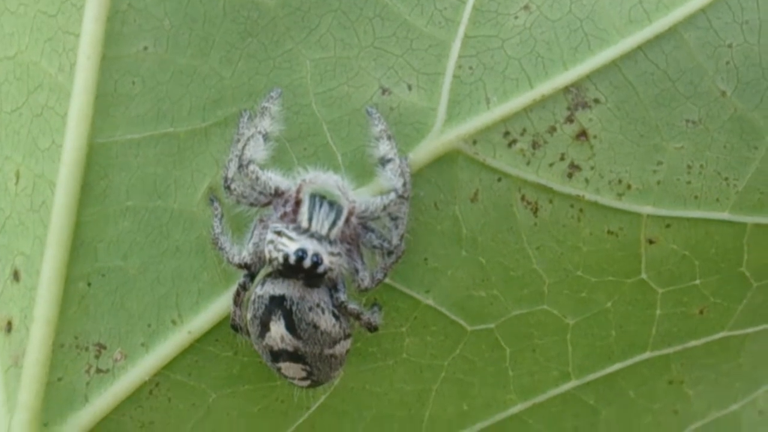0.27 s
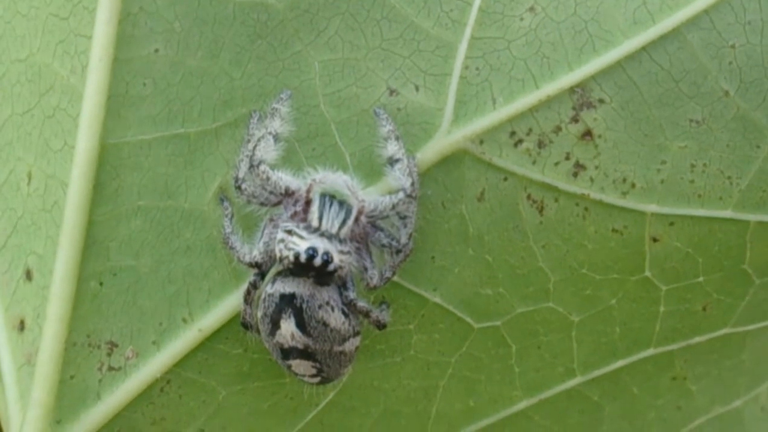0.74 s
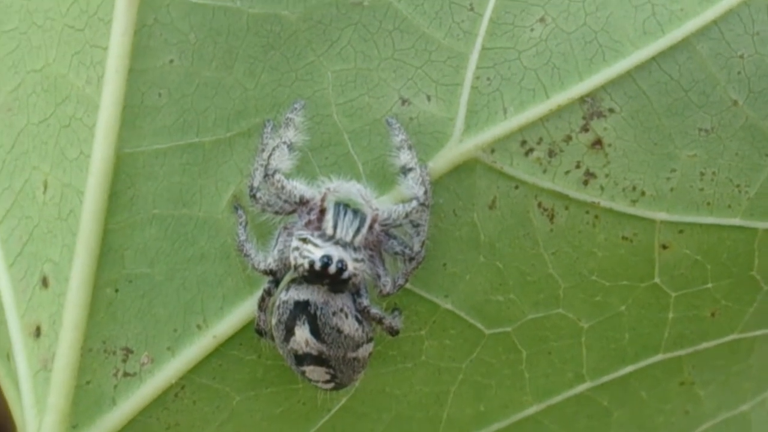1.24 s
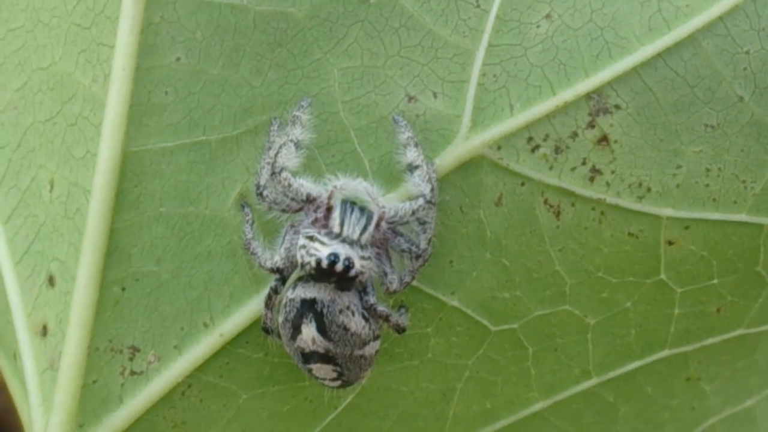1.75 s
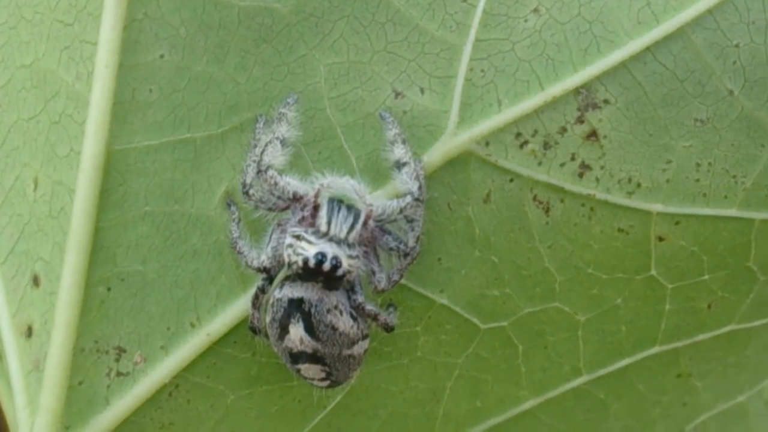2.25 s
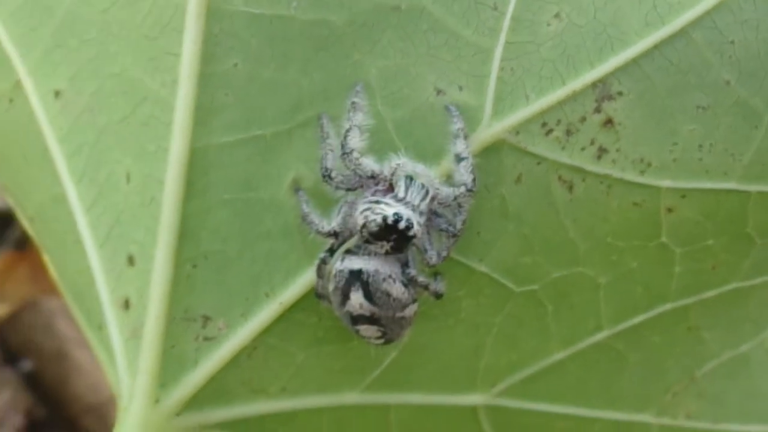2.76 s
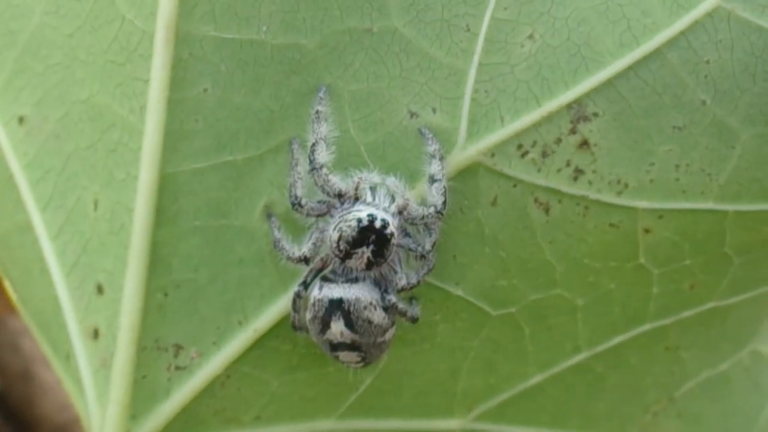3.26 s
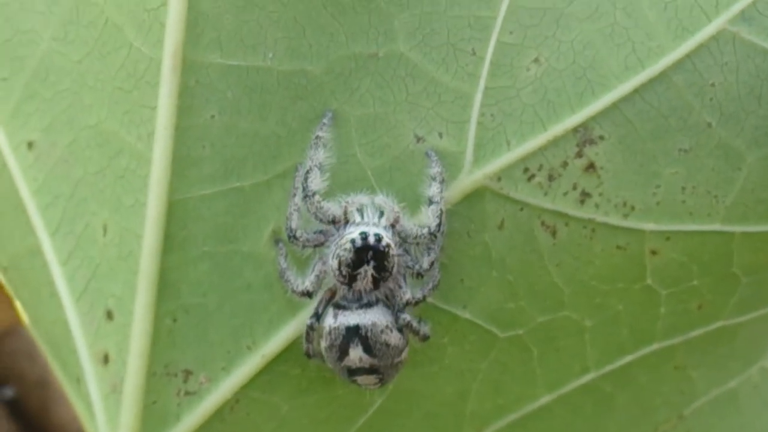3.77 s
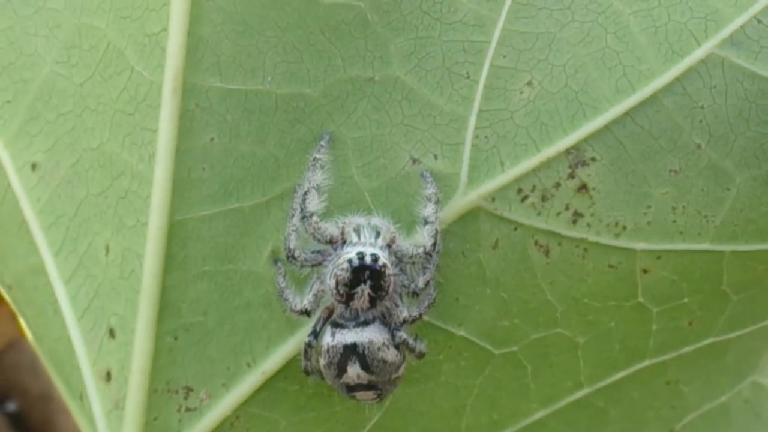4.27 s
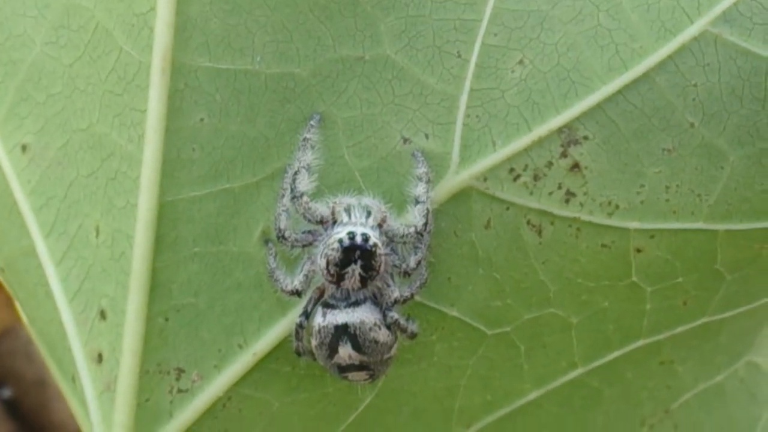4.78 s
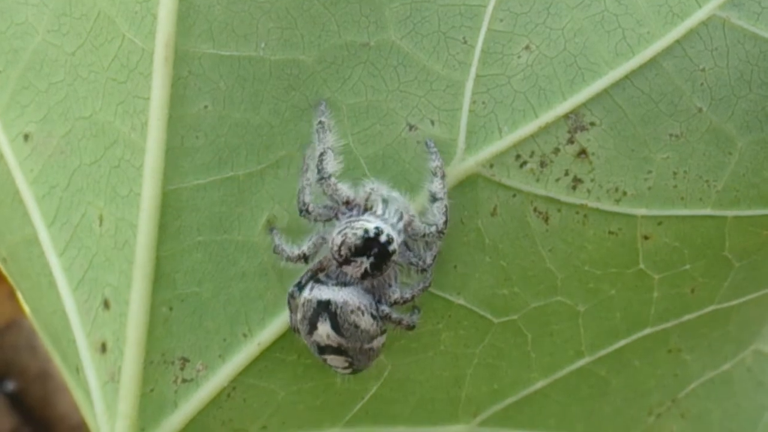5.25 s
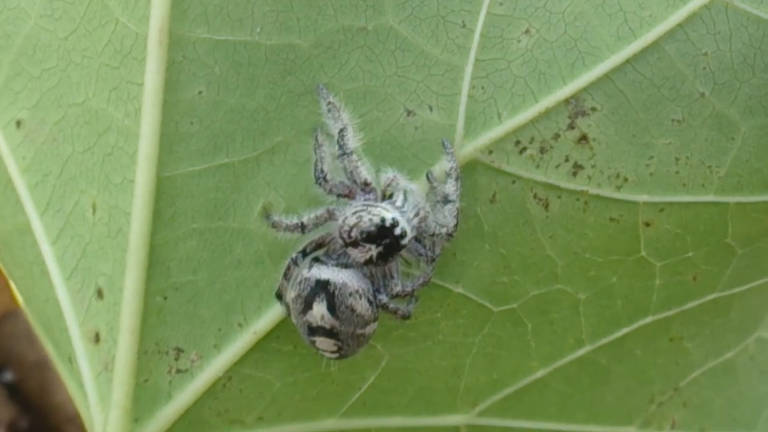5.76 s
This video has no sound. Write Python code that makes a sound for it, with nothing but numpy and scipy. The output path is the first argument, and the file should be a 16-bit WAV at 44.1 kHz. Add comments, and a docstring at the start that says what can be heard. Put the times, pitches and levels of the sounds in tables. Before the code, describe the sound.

A breeze rumbles on the microphone throughout, mostly on the right, over a faint high insect hiss and a distant, quickly pulsing cricket. In the first second, leaves brush in a few light rustles and thin, far-off whistles rise. The wind strengthens from about 2 to 3.5 seconds, with short low thumps. On the left, the hand holding the camera rumbles and knocks softly between 2.2 and 2.6 seconds and again near 3.5. At about 3.1 and 3.3 seconds, a small bird on the right gives two high, stuttering, slightly raspy chirps of quick falling notes, with a very short echo. The wind eases, then gusts and thumps again from 5 to 5.5 seconds, while more faint whistles rise in the distance. On the left, the lens ticks faintly about twice a second, its thin whir swelling slightly near 1.7 and 3.9 seconds.

```python
"""Outdoors among leaves, a breeze buffets a camera's right microphone port over a faint insect hiss.
A small bird gives two stuttering chirps of quick down-slurs; far off a cricket pulses and thin whistles
rise. The foliage scatters bird and whistles into a short echo, and leaves brush in brief rustles.
On the left, the hand rumbles through the camera body and the lens drive faintly whirs and ticks."""
import sys
import numpy as np
from scipy import signal
from scipy.fft import rfft, irfft, next_fast_len
from scipy.io import wavfile
from scipy.ndimage import uniform_filter1d, map_coordinates

SR = 44100
rng = np.random.default_rng(int(sys.argv[2]) if len(sys.argv) > 2 else 0)


def wav_out(sig):
    """Save sig, one row per channel (or a flat mono array), as 16-bit PCM at SR to the path in sys.argv[1]."""
    wavfile.write(sys.argv[1], SR, np.round(np.clip(np.atleast_2d(sig).T, -1, 1) * 32767).astype(np.int16))


N = 265482
TIME = np.arange(N) / SR


def amp(db):
    """Amplitude ratio of a level in decibels."""
    return 10 ** (np.asarray(db) / 20)


def unit(x):
    """Normalisation to an rms of 1."""
    return x / np.sqrt(np.mean(x ** 2) + 1e-20)


def along(points, hz):
    """Interpolation of (frequency [Hz], value) points on a logarithmic frequency axis."""
    frequencies, values = np.transpose(points)
    return np.interp(np.log(hz + 1), np.log(frequencies + 1), values)


def wobble(rate):
    """Smooth random modulation: a spline through `rate` Gaussian values a second."""
    return map_coordinates(rng.standard_normal(int(N * rate / SR) + 4), [TIME * rate])


def filtered(x, response):
    """Linear filtering: the spectrum of x is multiplied by a frequency response."""
    size = next_fast_len(N + SR // 2)
    return irfft(rfft(x, size) * response(np.fft.rfftfreq(size, 1 / SR)), size)[..., :N]


def noise(spectrum):
    """White noise shaped to a spectral density given as (frequency [Hz], density [dB/Hz])."""
    return filtered(rng.standard_normal(N), lambda hz: amp(along(spectrum, hz))) * np.sqrt(SR / 2)


def swell(centre_s, length_s):
    """Raised-cosine envelope: a smooth rise and fall."""
    return np.cos(np.pi * np.clip((TIME - centre_s) / length_s, -.5, .5)) ** 2


def scatter(width_hz):
    """Spectral broadening: a random complex gain that spreads a tone into a band."""
    return (wobble(width_hz) + 1j * wobble(width_hz)) / np.sqrt(2)


def placed(x, left_db, right_db):
    """Level difference between the two ports gives a sound its side."""
    return np.array([amp(left_db) * x, amp(right_db) * x])


# strength of the breeze (time [s], level [dB])
BREEZE_STRENGTH = [(0.0, -50), (0.14, -39.5), (0.26, -46), (1.3, -48.5), (1.96, -31), (2.24, -34.5),
                   (2.96, -34), (3.04, -36.5), (3.54, -34), (3.76, -42), (4.26, -41.5), (4.36, -49),
                   (4.88, -43.5), (5.06, -30.5), (5.4, -39.5), (5.48, -39.5), (5.6, -39.5), (6.0, -43)]
# slow buffets and fine flutter, each (frequency [Hz], relative density [dB])
BUFFET_SPECTRUM = [(8, 3), (20, 2.5), (32, 3.5), (55, -8), (85, -14), (130, -38), (250, -58), (600, -100)]
FLUTTER_SPECTRUM = [(50, -18), (95, 5.5), (140, -1), (200, -14.5), (300, -37), (600, -81), (2000, -40)]
# eddies striking the port (time [s], pulse level [dB], half-width [s], wake level [dB])
EDDY_STRIKES = [(.153, -31.5, 0.0048, -69), (1.681, -33, 0.0048, -54.5), (1.935, -18, 0.0043, -51),
                (2.477, -20.5, 0.0055, -47), (2.528, -35, .005, -47.5), (2.836, -24.5, 0.0053, -59),
                (2.936, -23.5, 0.0048, -60), (3.085, -35.5, 0.009, -42), (3.279, -29.5, 0.0057, -46.5),
                (3.504, -18.5, 0.0056, -47.5), (5.07, -23.5, 0.0037, -53), (5.251, -24.5, .0086, -57),
                (5.406, -31.5, 0.0066, -51.5), (5.476, -20.5, 0.0095, -51)]


def wind():
    """Turbulent pressure at the windward port: buffets and flutter grow with the breeze; eddies push."""
    strength_db = np.interp(TIME, *np.transpose(BREEZE_STRENGTH))
    buffet = amp(strength_db + 1.3 + 1.5 * wobble(14)) * unit(noise(BUFFET_SPECTRUM))
    flutter_gain = amp(-60.5 + 0.43 * (strength_db - strength_db.mean()) + wobble(10))
    eddies = np.zeros(N)
    for s, db, half_width, wake_db in EDDY_STRIKES:
        u = (TIME - s) / half_width
        eddies += amp(db) * (1 - u ** 2) * np.exp(-u ** 2 / 2)  # a push between two dips
        flutter_gain += amp(wake_db) * swell(s, length_s=0.082)
    flutter = flutter_gain * unit(noise(FLUTTER_SPECTRUM))
    return placed(buffet + flutter + eddies, left_db=-36, right_db=0)


# hush at the sheltered port and open air, each (frequency [Hz], density [dB/Hz])
HUSH_SPECTRUM = [(15, -73.5), (65, -76.5), (130, -86), (250, -92.5), (400, -97), (700, -103), (1500, -103),
                 (2300, -106), (3200, -106), (6500, -111), (9000, -108), (15500, -109)]
AIR_SPECTRUM = [(20, -91.5), (150, -87.5), (270, -89.5), (400, -94), (750, -99), (1500, -100),
                (2200, -95.5), (2900, -96.5), (3400, -100), (5000, -101), (8200, -104), (15500, -108)]
# insect chorus (frequency [Hz], relative density [dB])
INSECT_SPECTRUM = [(4500, -42), (5300, -4), (6000, 2.5), (7200, 2.5), (7650, -10), (8000, -3.5),
                   (10000, -67)]


def air_and_insects():
    """Incoherent sources merge into noise: air and insects on the right, a hush on the sheltered left."""
    drift_db = .45 * wobble(3) + .7 * wobble(16)
    air = noise(AIR_SPECTRUM) * amp(drift_db)
    shimmer_db = .5 * wobble(2) + .9 * wobble(18)
    chorus = unit(noise(INSECT_SPECTRUM)) * amp(-64 + shimmer_db)
    fading_db = np.interp(TIME, [0, 1, 1.6, 6], [0.27, -0.11, -1.1, -1.4])
    return np.array([noise(HUSH_SPECTRUM), (air + chorus) * amp(fading_db)])


# rumble of the grip (frequency [Hz], relative density [dB])
GRIP_SPECTRUM = [(8, 3.5), (20, 1.5), (55, -1), (100, -6.5), (150, -9), (220, -25.5), (400, -47.5),
                 (1000, -49)]
# shifts of the hand (centre time [s], duration [s], relative level [dB])
GRIP_SHIFTS = [(1.66, .4, -71), (2.182, 0.6, -48.5), (2.52, 0.52, -48.5), (3.197, .16, -61),
               (3.527, 0.27, -49), (4.927, 0.24, -52.5), (5.5, 0.39, -65)]
# soft knocks (onset [s], relative level [dB], frequency [Hz], 60 dB decay time [s])
HAND_KNOCKS = [(2.197, -31, 154, 0.045), (2.467, -44.5, 165, 0.075), (2.585, -42, 170, 0.062),
               (3.456, -36.5, 165, 0.034)]


def hand():
    """Structure-borne sound: the grip rumbles through the body and knocks excite damped vibrations."""
    resting = amp(-63.5)
    shifting = sum(amp(db) * swell(s, length) for s, length, db in GRIP_SHIFTS)
    body = (resting + shifting) * unit(noise(GRIP_SPECTRUM))
    for s, db, hz, t60 in HAND_KNOCKS:
        age = np.maximum(TIME - s, 0)
        phase = 2 * np.pi * hz * (age + 0.0047 * (1 - np.exp(-age / 0.0023)))  # starts high, settles
        attack = 1 - np.exp(-age / 0.011)
        body += amp(db + 4.5 - 60 * age / t60) * attack * np.sin(phase)
    return placed(body, left_db=1.5, right_db=-22)


# fizz of the lens drive (frequency [Hz], relative density [dB])
MOTOR_SPECTRUM = [(7500, -21), (9600, -5.5), (10900, -16), (11600, 0.5), (12200, -5), (12700, -7),
                  (13200, -0.5), (14400, -10), (15500, -13)]
# focus motor runs (start [s], end [s])
FOCUS_RUNS = [(1.61, 1.92), (3.78, 4.04)]


def lens_motor():
    """Machine noise, broadband and tonal: a fizz that grows and gains a whine while the lens refocuses."""
    switched_on = sum(1.0 * ((TIME > start) & (TIME < end)) for start, end in FOCUS_RUNS)
    running = uniform_filter1d(switched_on, size=900)
    fizz = unit(noise(MOTOR_SPECTRUM)) * amp(-71.5 + 4.4 * running + 2.5 * wobble(90))
    whine_hz = 11760
    whine = amp(-72) * running * np.real(scatter(width_hz=300) * np.exp(2j * np.pi * whine_hz * TIME))
    return placed(fizz + whine, left_db=3, right_db=-29)


def cricket():
    """Periodic amplitude modulation of a narrow band: even chirps, each sagging a little in pitch."""
    first_s, period_s, chirp_s = .04, .1189, 0.0677
    centre_hz, sag_hz = 7580, 280
    offset_s = (TIME - first_s + period_s / 2) % period_s - period_s / 2
    stroke = np.clip(offset_s / chirp_s, -.5, .5)
    phase = 2 * np.pi * np.cumsum(centre_hz - sag_hz * stroke) / SR
    carrier = np.real(np.exp(1j * phase) * scatter(width_hz=390))
    song = np.cos(np.pi * stroke) ** 2 * carrier * amp(0.91 * wobble(6.16))
    return placed(song, left_db=-94, right_db=-59.5)


# reverberation of the foliage (frequency [Hz], 60 dB decay time [s])
FOLIAGE_DECAY = [(2000, 0.09), (5500, 0.15), (10000, 0.033)]


def foliage_echo(x):
    """Diffuse scattering by leaves: convolution with a decaying noise tail, different at each port."""
    hz, age, spectra = signal.stft(rng.standard_normal((2, SR // 2)), SR, nperseg=256)
    decay = amp(-60 * age / along(FOLIAGE_DECAY, hz)[:, None])
    tail = signal.istft(spectra * decay, SR, nperseg=256)[1]
    return signal.fftconvolve(x[None], tail / np.linalg.norm(tail[0]), axes=1)[:, :N]


# distant whistles (centre time [s], duration [s], centre frequency [Hz], relative level [dB])
FAR_WHISTLES = [(0.246, 0.2, 7150, -62), (.44, 0.093, 7040, -62), (0.711, 0.12, 7030, -55.5),
                (1.012, 0.23, 7140, -60), (1.158, 0.15, 4100, -66.5), (3.28, 0.16, 6920, -61.5),
                (3.70, .11, 4400, -64), (4.88, 0.088, 7110, -61.5), (5.142, .17, 6920, -61.5),
                (5.318, .1, 6840, -61), (5.824, .14, 6900, -63), (5.996, .11, 4410, -63)]


def whistles():
    """Linear upward sweeps, the low ones steeper, blurred by scattering on their way through the leaves."""
    ceiling_hz, climb_per_s = 8940, 2.2
    blur = .6 + .8 * scatter(width_hz=450)
    voice = np.zeros(N)
    for s, length, hz, db in FAR_WHISTLES:
        hz_per_s = climb_per_s * (ceiling_hz - hz)
        pitch_hz = hz + hz_per_s * np.clip(TIME - s, -length / 2, length / 2)
        phase = 2 * np.pi * np.cumsum(pitch_hz) / SR
        voice += amp(db) * np.sqrt(swell(s, length)) * np.real(blur * np.exp(1j * phase))
    return placed(voice, left_db=-20, right_db=-1) + foliage_echo(voice) * amp([[-24], [-5]])


# leaves brushing (centre time [s], duration [s], relative level [dB], band centre [Hz], width [octaves])
LEAF_BRUSHES = [(0.244, 0.024, -58.5, 1950, 0.38), (0.436, 0.018, -57, 2700, .25),
                (0.647, 0.026, -56, 4200, 0.8), (0.652, .02, -58.5, 1020, 0.13),
                (.72, 0.12, -59, 3370, 0.29), (0.737, 0.25, -59.5, 4800, 0.84)]


def rustle():
    """Contact noise: leaves tap and brush in band-limited puffs, crinkled by fast amplitude modulation."""
    leaves = np.zeros(N)
    for s, length, db, centre_hz, octaves in LEAF_BRUSHES:
        white = rng.standard_normal(N)
        puff = filtered(white, lambda hz: np.exp(-(np.log2((hz + 1) / centre_hz) / octaves) ** 2 / 2))
        crinkle = amp(4.1 * wobble(250))
        leaves += amp(db) * swell(s, length) * unit(puff * crinkle)
    return placed(leaves, left_db=-18, right_db=1)


# tick of the lens drive (frequency [Hz], relative density [dB])
TICK_SPECTRUM = [(2500, -25), (4400, -16), (5100, 8), (6000, -5), (10000, -4), (13000, 2), (15500, 2.5)]
# quicker, uneven ticks after the regular run (time [s], relative level [dB])
UNEVEN_TICKS = [(5.1557, -50.5), (5.3198, -52), (5.3911, -53), (5.6265, -51)]


def lens_ticks():
    """Impulsive excitation: each tick of the lens drive is a noise burst with a fast exponential decay."""
    first_s, period_s, decay_s, regular_db = 0.2957, 0.4708, 0.0008, -50.5
    regular = [(first_s + k * period_s, regular_db) for k in range(11)]
    ticks = regular + list(UNEVEN_TICKS)
    envelope = sum(amp(db) * (TIME >= s) * np.exp(-abs(TIME - s) / decay_s) for s, db in ticks)
    return placed(envelope * unit(noise(TICK_SPECTRUM)), left_db=8, right_db=-18)


# bright edge of a raspy note (frequency [Hz], relative density [dB])
RASP_SPECTRUM = [(3500, -19), (5000, 6.5), (7300, 4), (8500, -10), (10500, -1), (15000, -24)]
# near bird's notes (centre time [s], duration [s], frequency [Hz], relative level [dB], roughness [0-1])
BIRD_NOTES = [(3.031, .008, 5080, -41, .05), (3.061, 0.012, 5700, -45, .15), (3.072, .009, 5000, -42, .3),
              (3.105, 0.016, 5010, -28.5, 0.17), (3.1354, 0.025, 5300, -39, 0.8),
              (3.294, 0.02, 4950, -44, .3), (3.325, .013, 5300, -41, .7), (3.3313, .014, 4950, -32, 0.26),
              (3.362, .026, 5220, -39.5, 0.7)]


def bird():
    """Exponential down-slurs; random modulation makes some raspy, and these fall less and trail a tone."""
    floor_hz, slur_s, trail_hz = 3860, 0.0125, 5450
    rasp = scatter(width_hz=1100)
    edge = unit(noise(RASP_SPECTRUM)) * amp(-5.5)
    trail = np.sin(2 * np.pi * trail_hz * TIME)
    voice = np.zeros(N)
    for s, length, hz, db, rough in BIRD_NOTES:
        sinking = np.exp(-np.maximum((TIME - s) / slur_s, -1)) - 1
        pitch_hz = hz + (hz - floor_hz) * (1 - rough) * sinking
        phase = 2 * np.pi * np.cumsum(pitch_hz) / SR
        tone = np.exp(1j * phase) + amp(-26) * np.exp(2j * phase)
        note = np.real(tone * (np.sqrt(1 - rough ** 2) + rough * rasp)) + rough * edge
        soft_start = amp(min(db - 17, -44)) * swell(s - 0.008, length_s=0.018)
        voice += (soft_start + amp(db) * swell(s, length)) * note
        voice += rough ** 2 * amp(db - 5) * swell(s + length / 2, length_s=0.044) * trail
    return placed(voice, left_db=-27, right_db=-5) + foliage_echo(voice) * amp([[-27], [-20]])


def scene():
    """Superposition: the pressures of all sources add at the two ports."""
    continuous = wind() + air_and_insects() + hand() + lens_motor()
    return continuous + cricket() + whistles() + rustle() + lens_ticks() + bird()


def record(dry):
    """Band limiting: the camera passes nothing above its cutoff frequency."""
    cutoff_hz = 15750
    return filtered(dry, lambda hz: hz < cutoff_hz)


dry = scene()
out = record(dry)
wav_out(out)
```